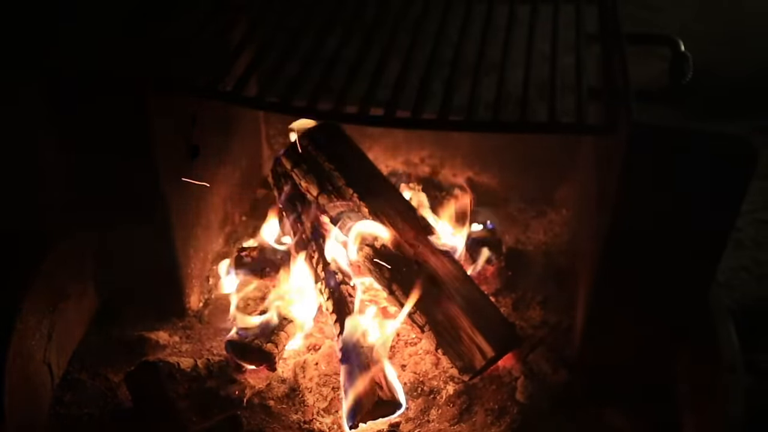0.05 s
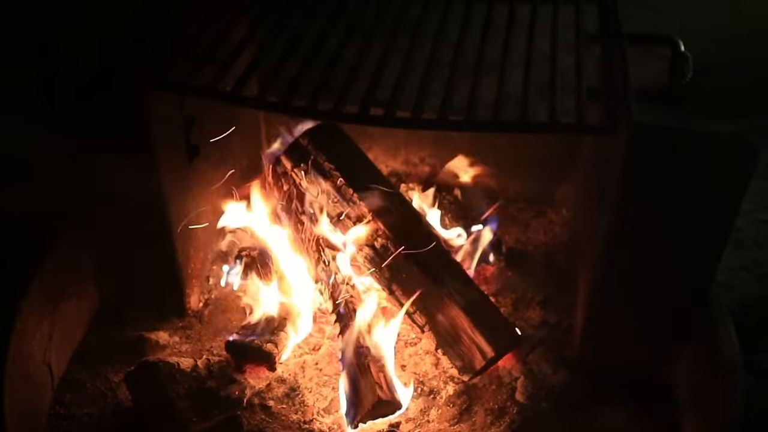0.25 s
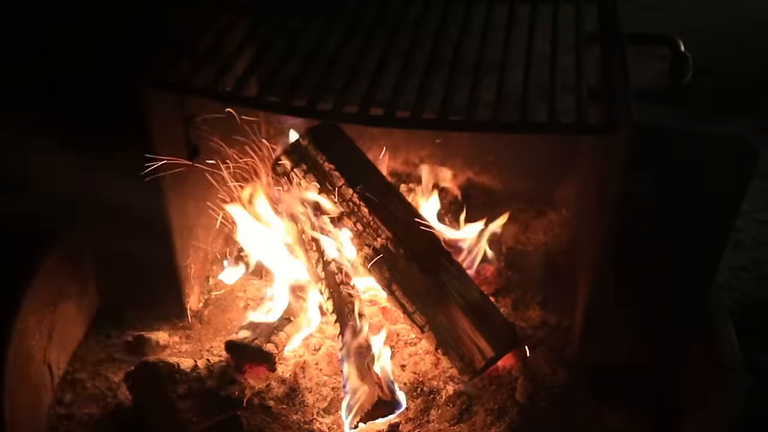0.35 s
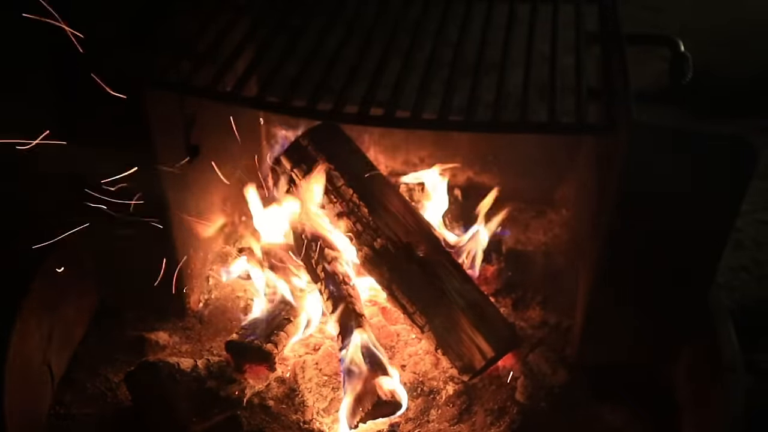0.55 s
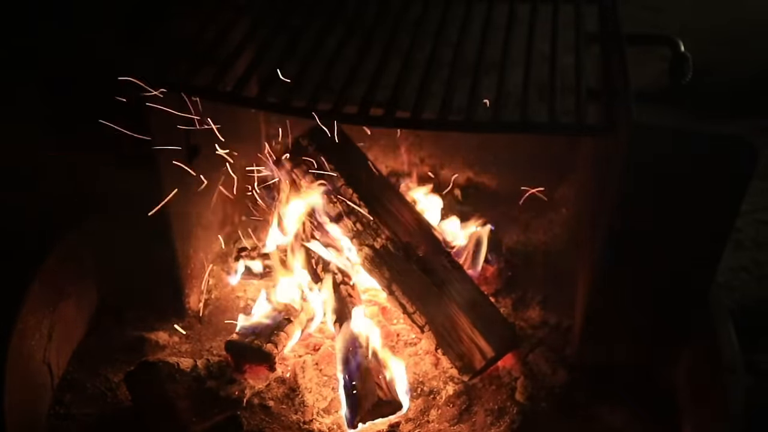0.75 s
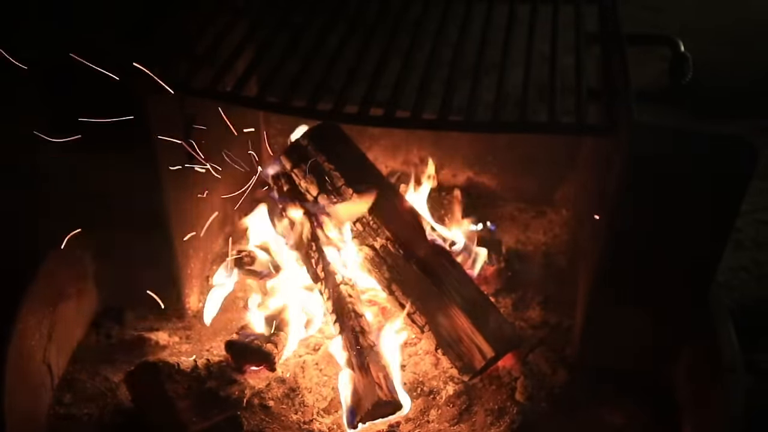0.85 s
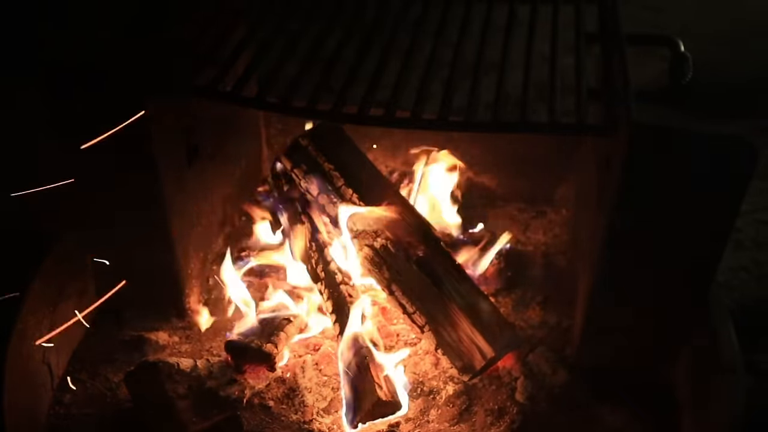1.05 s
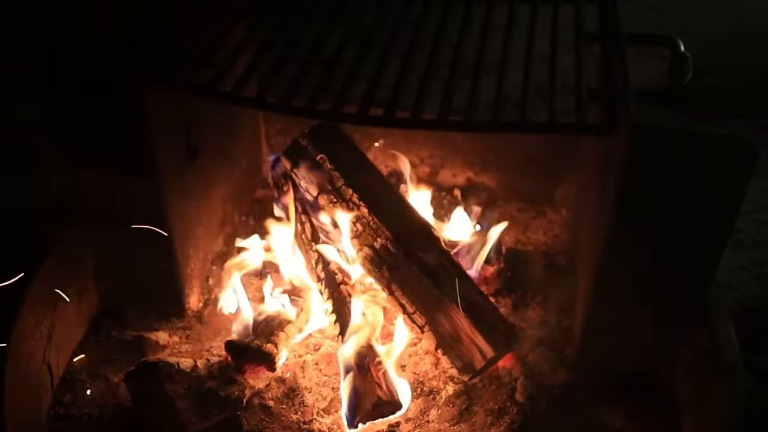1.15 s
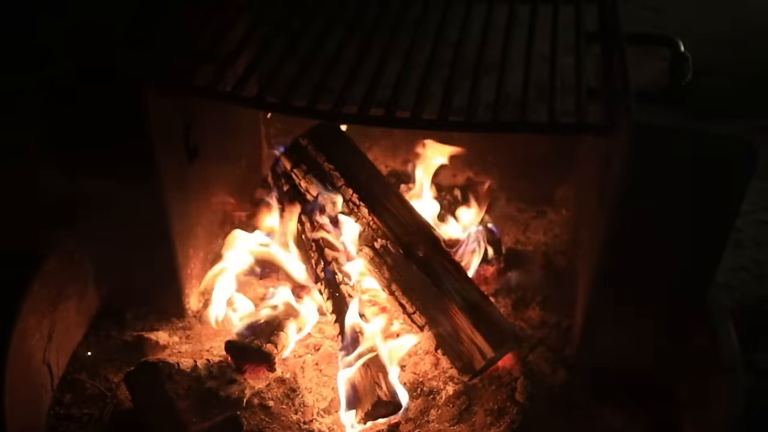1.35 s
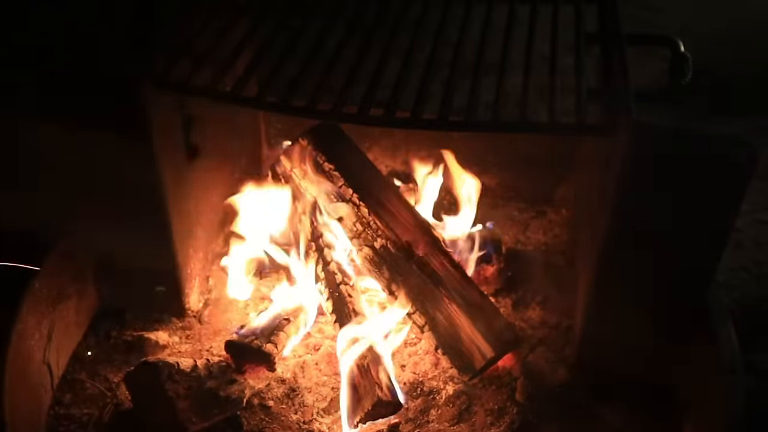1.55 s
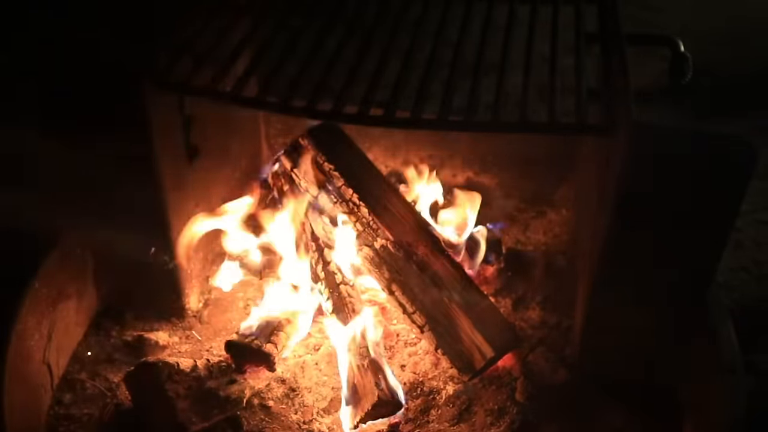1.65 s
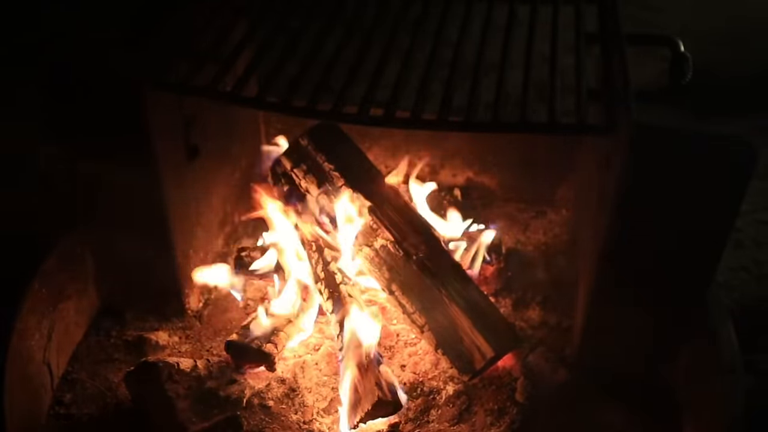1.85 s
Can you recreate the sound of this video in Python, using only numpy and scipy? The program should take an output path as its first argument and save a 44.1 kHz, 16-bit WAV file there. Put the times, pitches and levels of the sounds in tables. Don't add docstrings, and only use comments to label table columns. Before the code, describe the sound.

Campfire burning with a soft low rush, a sharp loud log burst, then scattered small pops

```python
import sys
import numpy as np
from scipy import signal
from scipy.io import wavfile

SR = 44100
rng = np.random.default_rng(int(sys.argv[2]) if len(sys.argv) > 2 else 0)


def decibels_to_gain(level_db):
    exponent = np.asarray(level_db, float) / 20
    return 10 ** exponent


def to_wav(sig):
    pcm = np.clip(np.atleast_2d(sig), -1, 1) * 32767
    pcm = np.round(pcm).astype(np.int16)
    wavfile.write(sys.argv[1], SR, pcm.T)


N = 83790

# t/s, flame rush level/dB, ember sizzle level/dB
FIRE_VIGOUR = [(0, -41, -69), (.1, -42, -71), (.3, -43, -65.5), (.55, -40.5, -86), (.7, -41.5, -65.5),
               (.81, -42.5, -60.5), (.92, -41.5, -66.5), (1.1, -42, -75), (1.3, -42, -76), (1.5, -41, -73),
               (1.7, -41.5, -74), (1.9, -43, -61.5)]


def rms_one(x):
    return x / np.sqrt(np.mean(x ** 2) + 1e-20)


def in_time(rows):
    s, *columns = np.transpose(rows)
    return [np.interp(np.arange(N) / SR, s, c) for c in columns]


def drift(rate):
    r = np.exp(-80 * np.pi * rate / SR)
    steps = rng.standard_normal(N // 40 + 2002)
    slow = signal.lfilter([1], [1, -2 * r, r * r], steps)[2000:]
    return np.interp(np.arange(N) / 40, np.arange(len(slow)), rms_one(slow))


def cut(x, hz, kind, order=2):
    sos = signal.butter(order, np.clip(hz, 10, .45 * SR), kind, fs=SR, output="sos")
    return signal.sosfilt(sos, x)


def resonate(x, hz, width):
    r = np.exp(-np.pi * width / SR)
    top_gain_one = np.array([1, 0, -1]) * (1 - r * r) / 2
    return signal.lfilter(top_gain_one, [1, -2 * r * np.cos(2 * np.pi * hz / SR), r * r], x + 1e-18)


def resonate_twice(x, hz, width, second_width):
    return resonate(resonate(x, hz, width), hz, second_width)


def banded_noise(spectrum, patchy_db):
    hz, db = np.transpose(spectrum)
    out = 0
    together = drift(3.0)
    edges = 40 * 2 ** np.arange(0, 9, 1 / 4)
    white = rng.standard_normal((2, N + 4000))
    for k, (low, high) in enumerate(zip(edges, edges[1:])):
        level_db = np.interp(np.log(low * high) / 2, np.log(hz), db)
        flicker_db = patchy_db * (0.96 * together + drift(24))
        band = cut(white[k % 2], [low, high], "band")[-N:]
        out = out + decibels_to_gain(level_db + flicker_db) * band
    return rms_one(out)


def fracture(ms, noise, rough=0.23):
    t = np.arange(len(noise)) / SR * 1000 / max(ms, .05)
    click = np.arange(len(noise)) == 0
    return click + rough * noise * np.exp(-t)


def add(track, s, db, sound):
    i = int(s * SR)
    part = track[i:i + len(sound)]
    part += (decibels_to_gain(db) * sound / np.abs(sound).max())[:len(part)]


def flame_rush():
    # f/Hz, level/dB
    rush_spectrum = [(50, -15.5), (140, -4.5), (230, -6.5), (450, -6.5), (720, -3.5), (1050, -8.5),
                     (1350, -21), (1650, -55), (2400, -67)]
    rush_db, _ = in_time(FIRE_VIGOUR)
    return decibels_to_gain(rush_db) * banded_noise(rush_spectrum, patchy_db=0.75)


def ember_sizzle():
    ticks_per_s, spread_db, cycles = 1200, 3.0, 4.0
    pitches = np.geomspace(1800, 3400, 12)
    sizes = decibels_to_gain(spread_db * np.minimum(rng.exponential(1, N), 4)) * rng.choice([-1, 1], N)
    born = rng.random(N) < ticks_per_s / SR
    dealt = rng.integers(0, 12, N)
    ticks = np.zeros(N)
    for k, hz in enumerate(pitches):
        ticks += resonate_twice(sizes * born * (dealt == k), hz, hz / cycles, hz / 2)
    _, sizzle_db = in_time(FIRE_VIGOUR)
    return decibels_to_gain(sizzle_db) * rms_one(ticks)


def far_engine():
    # multiple of the firing rate, level/dB
    engine_tones = [(3, -55), (4, -56), (5, -55), (6, -49)]
    # t/s, sixth multiple level/dB, third multiple level/dB
    air_carry = [(0.0, -57, -47), (0.068, -51, -54), (0.142, -48, -64), (0.232, -49, -55),
                 (0.284, -45, -72), (0.692, -54, -52), (0.814, -49.5, -60), (0.862, -63, -66),
                 (0.956, -44.5, -58.5), (1.45, -57, -58), (1.528, -55, -83), (1.598, -48.5, -67),
                 (1.666, -50, -76), (1.782, -55, -69), (1.878, -52.5, -81), (1.9, -51, -74)]
    firing_hz, wander, wobble_db = 24.51, 0.0053, 2.5
    phase = 2 * np.pi * np.cumsum(firing_hz * (1 + wander * drift(1.9))) / SR
    high_db, low_db = in_time(air_carry)
    carry_db = {3: low_db + 56.5, 6: high_db + 49.5}
    out = np.zeros(N)
    for k, db in engine_tones:
        level_db = db + carry_db.get(k, 0) + wobble_db * drift(5.6)
        out += np.sqrt(2) * decibels_to_gain(level_db) * np.sin(k * phase + rng.uniform(0, 2 * np.pi))
    return out


def air_buffet():
    # t/s, level/dB
    buffet_levels = [(0.0, -60), (0.068, -38.5), (0.11, -57), (0.184, -67), (0.206, -52), (0.38, -62),
                     (0.48, -56), (0.55, -63), (0.878, -57), (0.898, -66), (1.782, -72), (1.9, -64)]
    rumble = cut(rng.standard_normal(2 * N), 40, "low", order=4)
    rumble = cut(rumble, 16.6, "high")[N:]
    return decibels_to_gain(in_time(buffet_levels)[0]) * rms_one(rumble)


def small_pops():
    # t/s, peak level/dB, ring f/Hz, ring width/Hz, bright crack level/dB
    pop_events = [(0.0162, -48, 2400, 800, -26), (0.5047, -48, 4000, 2000, 8), (0.7182, -46, 3130, 1500, 4),
                  (0.806, -49, 2660, 900, -17), (0.8293, -44, 3100, 800, 2),
                  (0.842, -33.5, 3660, 2350, -3.5), (0.8785, -47, 4200, 1200, 1),
                  (0.889, -47.5, 2600, 1500, -10), (0.9633, -34.5, 4830, 2280, -5.5),
                  (0.9953, -32.5, 2530, 1160, -9), (1.011, -55, 3820, 500, -20),
                  (1.1079, -49.5, 2200, 800, -14), (1.1336, -43, 4290, 900, -6),
                  (1.2535, -40, 2550, 500, -22), (1.2694, -47, 2270, 900, -18),
                  (1.283, -33, 3340, 1520, -2), (1.3071, -49, 2680, 600, -14),
                  (1.3304, -44.5, 2400, 600, -24), (1.3938, -49, 3200, 1500, -11),
                  (1.6114, -49, 2030, 600, -14), (1.642, -45.5, 2850, 200, -20),
                  (1.695, -43.5, 2700, 1500, -9), (1.8858, -29, 2500, 1460, -7.5)]
    out = np.zeros(N)
    for s, db, hz, width, bright_db in pop_events:
        tear = fracture(0.92, rng.standard_normal(900))
        ring = resonate_twice(tear, hz, width, 2 * width)
        crack = cut(tear, [5230, 12800], "band")
        add(out, s + 0.00077, db, rms_one(ring) + decibels_to_gain(bright_db) * rms_one(crack))
    return out


def pit_echo(x):
    # level/dB, time to fade by 60 dB/s, top f/Hz
    echo_parts = [
        (-17, 0.027, 30000),
        (-37.5, 0.19, 18000),
    ]
    delay_ms, lowest_hz = 1.2, 600
    t = np.arange(SR // 4) / SR
    echo = np.zeros(len(t))
    for db, t60, top_hz in echo_parts:
        bounces = cut(rng.standard_normal(len(t)), top_hz, "low", order=1)
        echo += rms_one(bounces * 1.0) * decibels_to_gain(db - 60 * t / t60)
    echo = cut(echo * (t > delay_ms / 1000), lowest_hz, "high") / np.sqrt(SR / 1000)
    return signal.fftconvolve(x, echo)[:N]


def air_pushes():
    # t/s, peak level/dB, f/Hz, width/Hz
    push_events = [
        (.04, -40, 42, 40),
        (0.1758, -32, 266, 150),
    ]
    out = np.zeros(N)
    for s, db, hz, width in push_events:
        add(out, s, db, resonate_twice(signal.unit_impulse(SR // 4), hz, width, width))
    return out


def loud_burst():
    # f/Hz, width/Hz, level/dB
    burst_log = [(820, 560, 1.5), (1393, 760, 2), (2600, 1010, 1.5), (4720, 870, 0), (7520, 1700, -5.5),
                 (10700, 590, -1), (11430, 990, -3.5), (13750, 2300, -12)]
    tear = fracture(.3, rng.standard_normal(1500), rough=.08)
    body = np.zeros(len(tear))
    for k, (hz, width, db) in enumerate(burst_log):
        body += (-1) ** k * decibels_to_gain(db) * resonate(tear, hz, width)
    out = np.zeros(N)
    add(out, .1766, 5, -cut(body, 537, "high"))
    return out


def dull_knock():
    # f/Hz, width/Hz, level/dB, direction (+1 or -1)
    knock_log = [(420, 300, -3, 1), (1050, 350, -5, 1), (1920, 330, 1, 1), (2480, 480, -1, 1),
                 (4250, 900, -7, -1), (5600, 2400, -16, 1)]
    tear = fracture(.8, rng.standard_normal(1500), rough=.05)
    body = np.zeros(len(tear))
    for hz, width, db, sign in knock_log:
        body += sign * decibels_to_gain(db) * resonate_twice(tear, hz, width, width)
    out = np.zeros(N)
    add(out, 1.2014, -22, -cut(body, 7500, "low"))
    return out


def scene():
    fire = flame_rush() + ember_sizzle()
    cracks = small_pops() + loud_burst() + dull_knock()
    mono = fire + far_engine() + air_buffet() + cracks + pit_echo(cracks) + air_pushes()
    return np.array([mono, mono])


def microphone_hiss():
    # f/Hz, level per Hz/dB
    hiss_spectrum = [(1000, -43), (1800, 3), (2800, 1.5), (4500, -1), (8000, -3.5), (13000, -4.5),
                     (15800, -7)]
    return decibels_to_gain(-62) * cut(banded_noise(hiss_spectrum, patchy_db=0.27), 1100, "high")


def low_pass(x):
    return signal.sosfilt(signal.butter(12, 17060, fs=SR, output="sos"), x)


def record(dry):
    clip_level = .74
    heard = dry + microphone_hiss()
    squeezed = heard / (1 + np.abs(heard / clip_level) ** 4) ** (1 / 4)
    side_noise = decibels_to_gain(-73.5) * rms_one(cut(rng.standard_normal(N), 4500, "high", order=1))
    x = squeezed + side_noise * [[1], [-1]]
    x = signal.sosfilt(signal.cheby2(10, 60, 17250, fs=SR, output="sos"), x)
    return low_pass(x)


dry = scene()
out = record(dry)
to_wav(out)
```